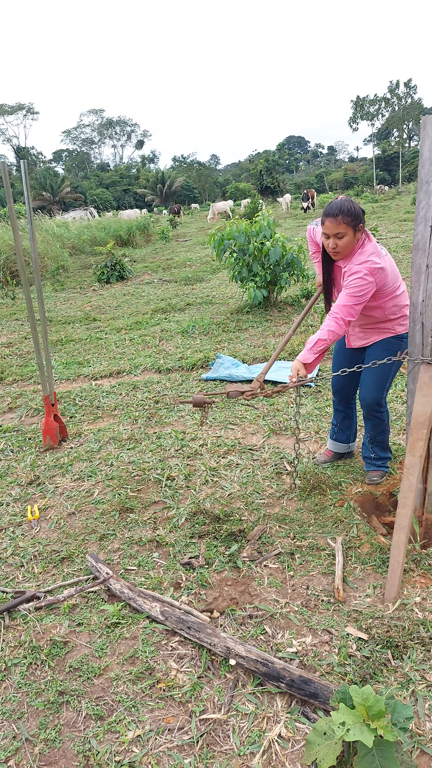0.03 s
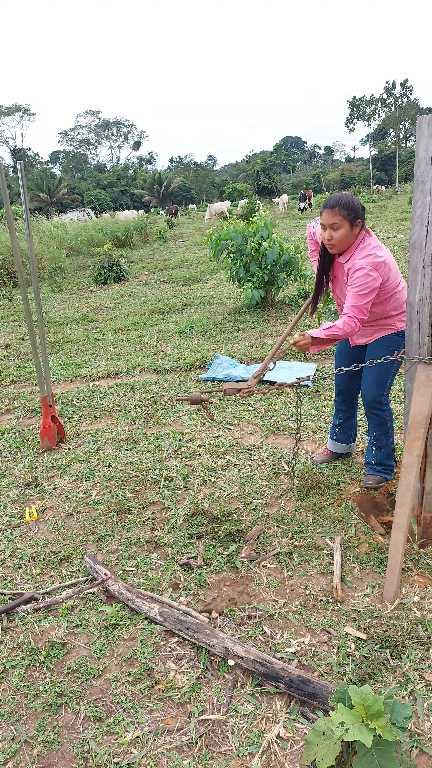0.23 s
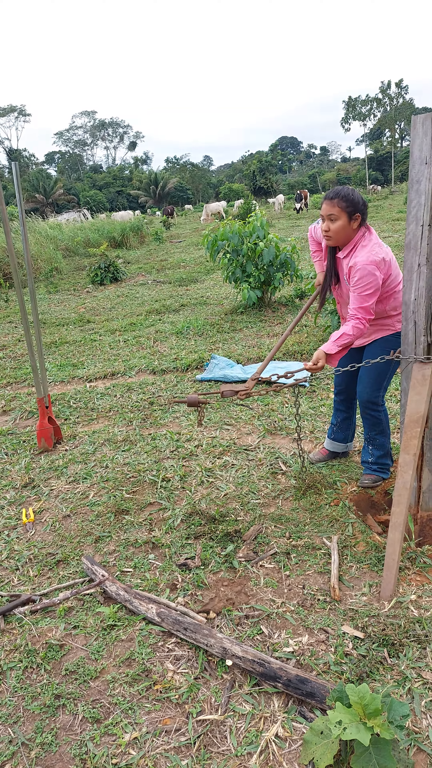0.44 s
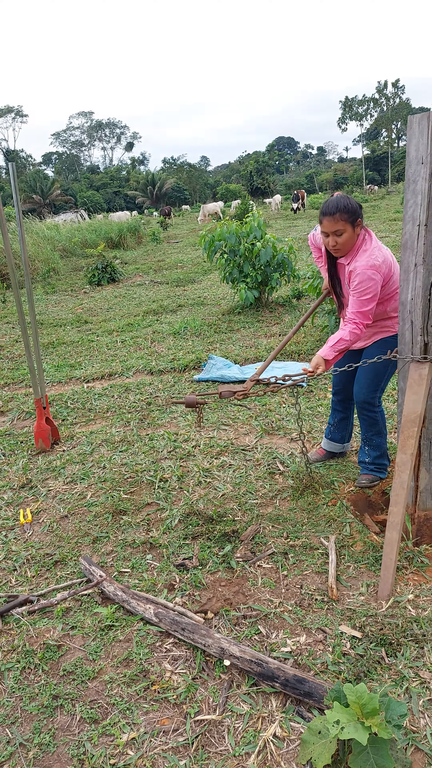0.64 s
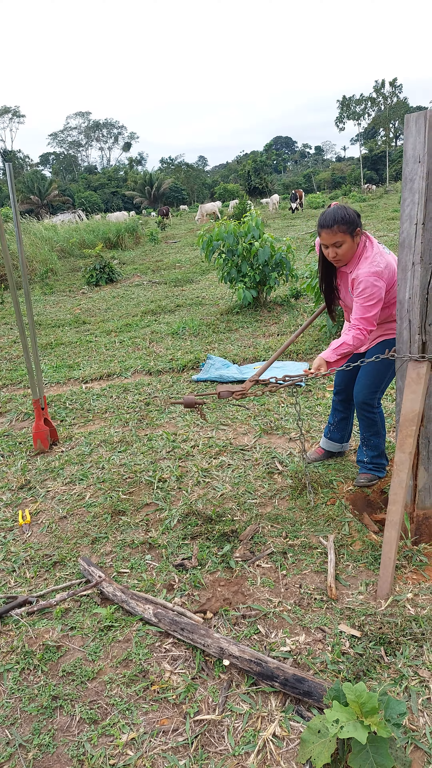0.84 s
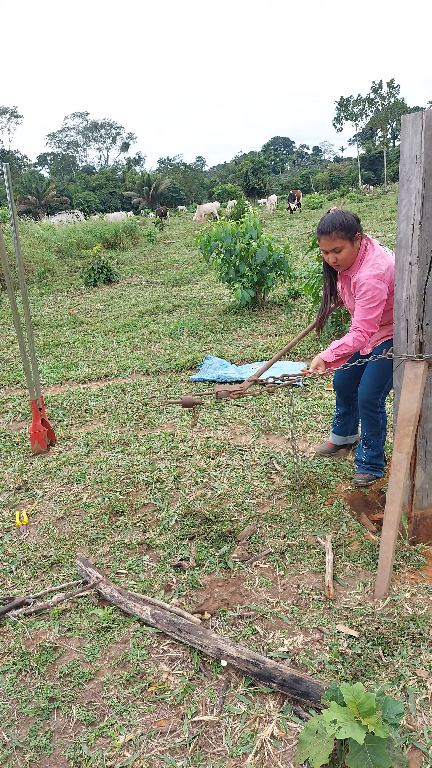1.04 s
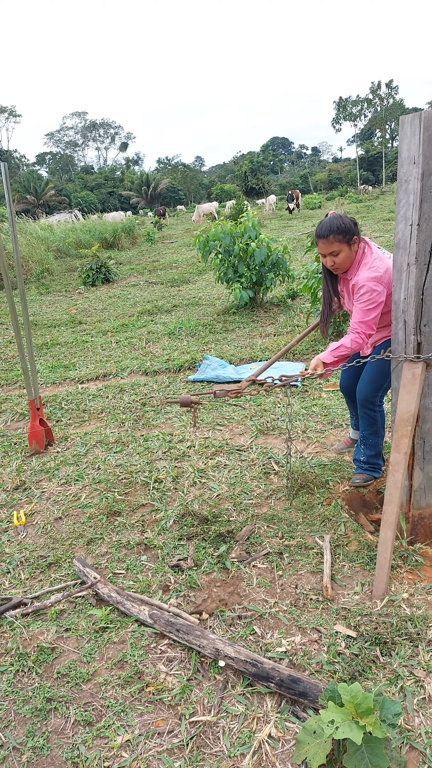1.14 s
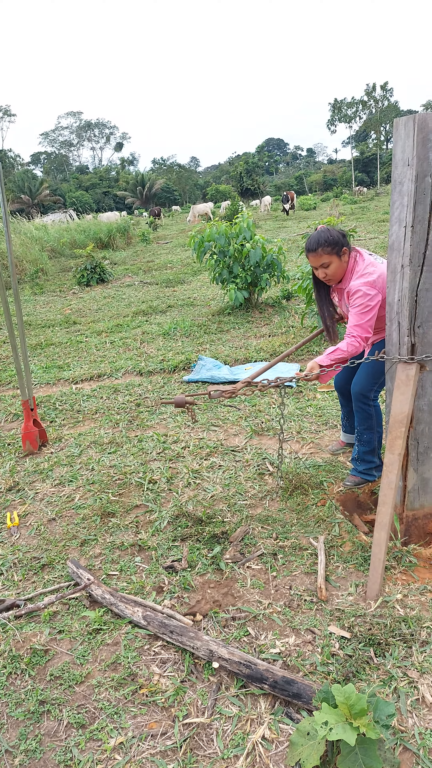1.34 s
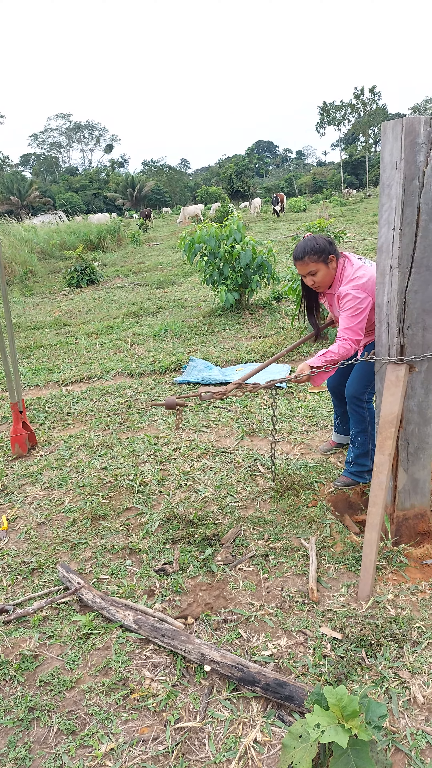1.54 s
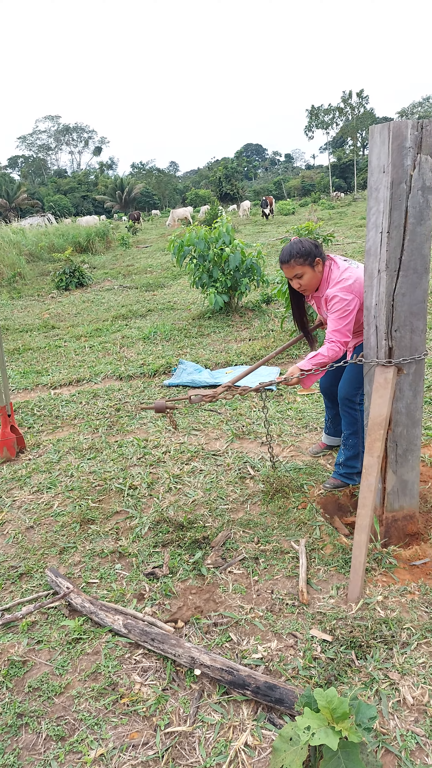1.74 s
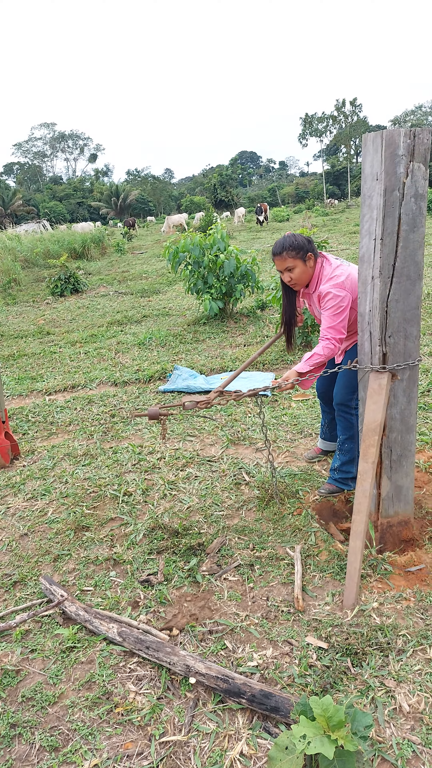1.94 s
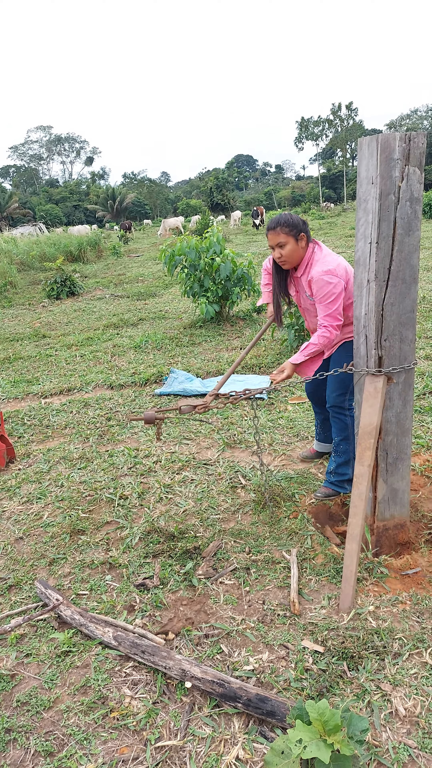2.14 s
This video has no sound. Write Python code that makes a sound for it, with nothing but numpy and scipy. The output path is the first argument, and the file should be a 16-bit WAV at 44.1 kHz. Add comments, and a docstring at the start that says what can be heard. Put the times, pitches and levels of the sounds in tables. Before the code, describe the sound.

A steel chain clinks sharply as it is worked by hand on a hoist. Duller clunks and small link ticks follow, then wind and one pop hit the microphone's right side. Faint insects hiss across a quiet pasture.

```python
"""One sharp steel clink at a fence post in a quiet pasture: a chain is being worked by hand on a hoist.
Duller clunks follow as the slack is taken up and the hoist shakes, with small ticks between them
where link strikes link. Insects hiss far off, and the chain rustles softly as it is drawn along.
Right at the microphone, wind and one sharp pop hit the right port."""
import sys
import numpy as np
from scipy import signal
from scipy.fft import rfft, irfft, next_fast_len
from scipy.io import wavfile
from scipy.ndimage import uniform_filter1d

SR = 44100
rng = np.random.default_rng(int(sys.argv[2]) if len(sys.argv) > 2 else 0)


def digitize_waveform(pressure):
    """Quantize a signal to 16-bit integers and store it at the path in sys.argv[1].

    Rows of a 2-D input are taken as channels; values are limited to [-1, 1].
    """
    field = np.atleast_2d(pressure).T
    bounded = np.clip(field, -1, 1)
    quanta = np.round(bounded * 32767).astype(np.int16)
    wavfile.write(sys.argv[1], SR, quanta)


N = 97020
METAL_APART = .55  # the steel's noise at each port alone, as a ratio to what both share


def amp(db):
    """Decibels to gain."""
    return 10 ** (np.asarray(db) / 20)


def unit_rms(x):
    """Scales to rms 1."""
    return x / np.sqrt(np.mean(x ** 2) + 1e-20)


def add(mix, start_s, sound):
    """Mixes a sound in at start_s."""
    part = mix[..., max(round(start_s * SR), 0):][..., :sound.shape[-1]]
    part += sound[..., :part.shape[-1]]


def colour(x, curve):
    """Filters by a curve of (freq_hz, gain_db), at minimum phase so that attacks stay sharp."""
    size = 8192
    hz, db = np.transpose(curve)
    log_hz = np.log(np.fft.rfftfreq(size, 1 / SR) + 1)
    log_gain = np.log(amp(np.interp(log_hz, np.log(hz), db)))
    cepstrum = irfft(log_gain)[:size // 2]
    cepstrum[1:] *= 2
    taps = irfft(np.exp(rfft(cepstrum, size)))[:size // 2]
    return signal.fftconvolve(x, taps[None], axes=-1)[:, :x.shape[-1]]


def noise(spectrum, count, apart):
    """Coloured noise of rms 1 at both ports; a larger `apart` makes them less alike."""
    lead = SR // 10
    white = rng.standard_normal((3, count + lead))
    return unit_rms(colour(white[0] + apart * white[1:], spectrum)[:, lead:])


def fader(curve):
    """A curve of (time_s, level_db) as gain over the scene."""
    return amp(np.interp(np.arange(N) / SR, *np.transpose(curve)))


def envelope(rise_s, t60_s, count=SR // 2):
    """Linear rise and exponential decay."""
    t = np.arange(count) / SR
    return np.minimum(t / rise_s, 1) * np.exp(-np.log(1000) * np.maximum(t - rise_s, 0) / t60_s)


def burst(spectrum, rise_s, t60_s):
    """Many close modes dying together as noise; each blow favours different ones above 2 kHz."""
    hz, db = np.transpose(spectrum)
    grid_hz = np.r_[np.geomspace(20, 1000, num=40), np.arange(1150, 16500, 150)]
    uneven_db = 2 * rng.standard_normal(len(grid_hz)) * (grid_hz > 2000)
    blow_db = np.interp(np.log(grid_hz), np.log(hz), db) + uneven_db
    shape = envelope(rise_s, t60_s)
    ringing = noise(np.c_[grid_hz, blow_db], len(shape), METAL_APART) * shape
    return unit_rms(ringing) * np.sqrt(np.mean(shape ** 2))


def ring(modes, rise_s, detune):
    """Decaying sines whose envelopes peak together; each blow shifts their pitches a little."""
    t = np.arange(SR // 2) / SR - rise_s
    out = np.zeros(len(t))
    for hz, db, t60_s in modes:
        pitch_hz = hz * (1 + detune * rng.standard_normal())
        out += amp(db) * envelope(rise_s, t60_s) * np.sin(2 * np.pi * pitch_hz * t)
    return out


def pasture():
    """Low air over the pasture and far insects near 5.5 kHz, wavering slightly together."""
    # Spectrum of air and insects: freq_hz, density_db
    air = [(20, -20.5), (55, 0), (80, -1.5), (130, -9.5), (330, -19), (460, -24), (545, -15.5), (760, -26),
           (1050, -25), (1280, -24), (1700, -26), (3000, -31.5), (4500, -33), (5450, -14.5), (6300, -33.5),
           (9000, -33.5), (15000, -33)]
    drift = uniform_filter1d(rng.standard_normal(N), size=2500)
    swell_db = unit_rms(uniform_filter1d(drift, size=1500))
    return amp(-67.5 + swell_db) * noise(air, N, apart=.9)


def chain_rustle():
    """The chain rustles softly as it is drawn along."""
    # Rise and fall of the rustle: time_s, level_db
    levels = [(0, -100.5), (.5, -93.5), (.7, -80), (1.02, -80.5), (1.16, -58.5), (1.25, -75.5), (1.45, -65),
              (1.7, -68.5), (1.9, -83), (2.2, -98)]
    # Its spectrum: freq_hz, density_db
    spectrum = [(200, -8.5), (440, -2.5), (545, 18), (700, 2.5), (950, -2.5), (1300, 8.5), (1650, -4.5),
                (2600, -10.5), (4500, 2.5), (8000, -5), (12500, -4), (15500, -3)]
    return fader(levels) * noise(spectrum, N, apart=1.2)


def wind():
    """Lumpy turbulence on the microphone with a few buffets, nearly all at the right port."""
    # The gust at the right port: time_s, level_db
    gust = [(0, -83.5), (1.3, -68), (1.385, -38), (1.45, -33), (1.51, -41.5), (1.6, -38.5), (1.75, -46.5),
            (1.86, -38), (1.92, -47), (2.05, -56), (2.2, -62.5)]
    # Spectrum of the turbulence: freq_hz, density_db
    spectrum = [(15, -29.5), (28, -20.5), (48, 0), (75, 1), (130, -11), (230, -10.5), (400, -30.5),
                (1000, -59), (4000, -97.5)]
    # Single swings of pressure: centre_s, peak_db, half_width_s
    buffets = [(1.389, -17.5, 0.0013), (1.437, -25, 0.0024), (1.4613, -20, 0.0013), (1.488, -24.5, .0015),
               (1.812, -35, 0.0011), (1.852, -38.5, 0.0016), (1.883, -34, 0.0018)]
    air = fader(gust) * noise(spectrum, N, apart=1.2)
    for centre_s, peak_db, half_width_s in buffets:
        offset = (np.arange(N) / SR - centre_s) / half_width_s
        air += amp(peak_db) * offset * np.exp((1 - offset ** 2) / 2)
    return air * amp([[-24.5], [0]])  # left, right


def port_pop():
    """One dry pop rings the right port for a moment and barely reaches the left."""
    # Modes of the port: pitch_hz, relative_db, t60_s
    modes = [(486, -9.5, 0.017), (1270, 1, 0.0054), (1670, 1, 0.0058), (2970, -2.5, 0.0025),
             (5060, -7.5, 0.0043)]
    out = np.zeros((2, N))
    add(out, start_s=1.6238, sound=amp(-16.5) * ring(modes, rise_s=.00048, detune=.0062))
    return out * amp([[-29.5], [0]])  # left, right


def after_ring(metal):
    """The chain keeps shimmering faintly after each blow."""
    # Colour of the shimmer: freq_hz, gain_db
    shimmer = [(60, -14.5), (120, -17.5), (350, -21), (550, -10.5), (800, -23.5), (1050, -23.5),
               (1300, -14), (1650, -24.5), (2300, -25), (3700, -19), (7000, -31.5), (10000, -28),
               (11500, -31), (15000, -27)]
    tail = rng.standard_normal(SR) + METAL_APART * rng.standard_normal((2, SR))
    tail *= envelope(rise_s=.01, t60_s=.66, count=SR)
    tail /= np.linalg.norm(tail[0])
    return colour(signal.fftconvolve(metal, tail, axes=1)[:, :N], shimmer)


def hoist_clunks():
    """The chain pulls up short and shakes the hoist; the low thud outlasts the bright rattle."""
    # Jerks on the hoist: start_s, thud_db, body_db, rattle_db, ring_db, rise_s, body_t60_s
    jerks = [(0.123, -68.5, -62.5, -68, -70.5, 0.0077, 0.48), (.26, -68, -45, -38.5, -59.5, 0.0034, 0.091),
             (0.678, -61.5, -63.5, -96, -57, 0.0034, 0.2), (0.751, -44, -29.5, -37.5, -31, 0.0012, 0.11),
             (.812, -50, -57.5, -65, -61.5, 0.01, 0.12), (.858, -57.5, -48, -76, -58, 0.0091, 0.19),
             (1.188, -59.5, -57, -67.5, -62.5, 0.0047, 0.16), (1.3085, -31, -26, -29, -30, 0.0043, 0.099),
             (1.447, -53, -41.5, -46, -55.5, 0.001, 0.13), (1.488, -51, -42, -52, -49.5, 0.0033, 0.13),
             (1.666, -57.5, -42.5, -51, -54, .011, 0.13), (1.96, -63.5, -44.5, -50.5, -60, 0.0017, 0.21),
             (2.031, -41.5, -39, -40, -53, 0.013, 0.078)]
    # Spectra of its dense low, middle and high ringing: freq_hz, density_db
    thud = [(30, -23.5), (70, -6.5), (115, 5.5), (170, -16.5), (225, -1), (330, -18.5), (600, -31),
            (2000, -69)]
    body = [(100, -42.5), (300, -10.5), (470, 2.5), (570, 6), (720, -5), (850, -5.5), (1150, -3.5),
            (1380, -4), (1700, -12.5), (3000, -30.5), (8000, -64)]
    rattle = [(500, -28.5), (1500, -1.5), (2300, 9.5), (3000, -2), (3650, 0), (4400, -7.5), (5450, 10),
              (6400, -13.5), (9500, -8.5), (11700, -20.5), (13200, -14.5), (15500, -29)]
    # Modes of the hoist: pitch_hz, relative_db, t60_s
    modes = [(120.3, -4, 0.11), (215, -17.5, 0.043), (477.4, -7, 0.055), (568.3, -4, 0.15),
             (684, -9.5, 0.14), (848.7, -9.5, .09), (1313, -10, 0.13), (3700, -21, .16), (5630, -25, 0.067)]
    out = np.zeros((2, N))
    for start_s, thud_db, body_db, rattle_db, ring_db, rise_s, body_t60_s in jerks:
        add(out, start_s, amp(thud_db) * burst(thud, rise_s, body_t60_s * 1.5))
        add(out, start_s, amp(body_db) * burst(body, rise_s, body_t60_s))
        add(out, start_s, amp(rattle_db) * burst(rattle, rise_s, body_t60_s * .59))
        add(out, start_s, amp(ring_db) * ring(modes, rise_s, detune=.0048))
    return out


def link_clinks():
    """Links snap against each other, ringing and scraping; loose parts sing out."""
    # Steel on steel: start_s, ping_db, scrape_db, ring_db
    strikes = [(.1215, -67, -50, -64.5), (0.1507, -58, -53.5, -63.5), (.174, -64.5, -52.5, -54.5),
               (0.2005, -18.5, -25, -28), (0.224, -37.5, -38, -65), (.2595, -54, -50.5, -50.5),
               (.388, -92, -59, -64), (0.698, -71, -90, -85), (.7495, -65, -41, -67),
               (0.7758, -42.5, -45, -63), (0.853, -66, -58, -72), (1.3076, -46, -33, -55),
               (1.3125, -38.5, -38.5, -52), (1.336, -37, -39, -46.5), (1.341, -38.5, -55.5, -79),
               (1.588, -54, -51, -75), (1.81, -73, -76, -84), (1.958, -55, -49, -76),
               (2.0392, -50.5, -51, -64.5)]
    # Modes of the high ping, then the link's modes: pitch_hz, relative_db, t60_s
    ping_modes = [(11130, 0, .018), (11560, -5, .015), (11081, -9, .07), (11160, -13, .1), (11520, -12, .1),
                  (11685, -12, .09), (11972, -18, .09), (12860, -25, .07)]
    link_modes = [(2070, -2, .23), (3090, -13, .14), (3659, -19, .52), (3722, -8, .13), (3844, -9, .11),
                  (4539, -8, .11), (4898, 5, .09), (5056, -6, .08), (5965, -16, .12), (6514, -12, .12),
                  (7643, -5, .1)]
    # Spectrum of the scrape: freq_hz, density_db
    scrape = [(100, -27.5), (440, -18.5), (560, 6.5), (700, 3), (820, -7), (1050, -1), (1700, 0),
              (2700, -8), (3700, -3), (5200, 2.5), (6800, -3.5), (9500, -10.5), (11500, -2), (13700, -13),
              (14700, -16), (15700, -24.5)]
    # Loose parts, each at its own pitch: start_s, pitch_hz, level_db, t60_s
    tinks = [(.15, 7640, -50, 0.082), (.174, 4390, -52, 0.028), (.521, 11240, -73, .17),
             (.523, 11600, -69, .2), (.751, 1083, -28, 0.12), (.7765, 5580, -34.5, 0.035),
             (.825, 11000, -55.5, 0.25), (1.035, 11250, -75, 0.41), (1.309, 562.3, -24.5, 0.089),
             (1.3142, 13000, -30.5, 0.057), (1.589, 11830, -55.5, 0.082), (1.958, 5380, -32, 0.018),
             (2.036, 2213, -42.5, 0.08), (2.036, 831, -41.5, 0.09)]
    out = np.zeros((2, N))
    for start_s, ping_db, scrape_db, ring_db in strikes:
        # Each sharp strike sets off a piercing ping near 11 kHz, the microphone port's resonance.
        add(out, start_s, amp(ping_db) * ring(ping_modes, rise_s=.0008, detune=.0003))
        add(out, start_s, amp(ring_db) * ring(link_modes, rise_s=.0008, detune=.00037))
        add(out, start_s, amp(scrape_db) * burst(scrape, rise_s=.00063, t60_s=.12))
    for start_s, *mode in tinks:
        add(out, start_s, ring([mode], rise_s=.0015, detune=.0003))
    return out


def right_port(x):
    """The microphone's right port has its own colour and delay."""
    # Response of the right port against the left: freq_hz, gain_db
    response = [(60, -3), (400, -0.5), (850, 4.5), (1300, -1), (1800, 7), (2100, -6), (2550, -15.5),
                (3300, 2), (5500, -0.5), (6500, -18), (7900, -11.5), (9800, 2), (11200, 7), (12800, 9.5),
                (15000, -10.5)]
    # Its phase behind the left: freq_hz, lag_rad
    lags = [(20, 0.5), (800, 0.3), (1300, 2), (1700, 2.5), (2500, 6), (3300, 7), (5300, 10), (6500, 12.5),
            (8000, 11), (11000, 10.5), (14000, 15)]
    size = next_fast_len(N + SR)
    log_hz = np.log(np.fft.rfftfreq(size, 1 / SR) + 1)
    gain_db, lag_rad = (np.interp(log_hz, np.log(hz), values)
                        for hz, values in (np.transpose(response), np.transpose(lags)))
    return irfft(rfft(x, size) * amp(gain_db) * np.exp(-1j * lag_rad), size)[:N]


def scene():
    """Chain and pasture carry to both ports; wind and pop act on the ports directly."""
    metal = link_clinks() + hoist_clunks()
    left, right = metal + after_ring(metal) + pasture() + chain_rustle()
    return np.array([left, right_port(right)]) + wind() + port_pop()


def record(dry):
    """The recorder clips at full scale and cuts the treble above 15.9 kHz."""
    lowpass = signal.firwin(511, 15900, window=("kaiser", 9), fs=SR)
    return signal.oaconvolve(np.clip(dry, -1, 1), lowpass[None], "same")


dry = scene()
out = record(dry)
digitize_waveform(out)
```